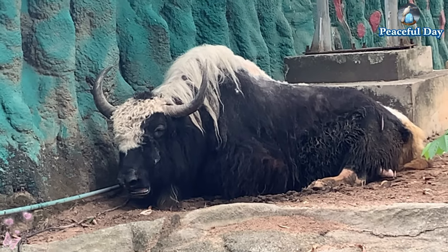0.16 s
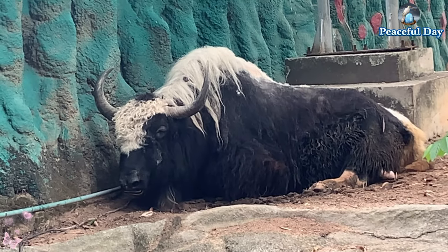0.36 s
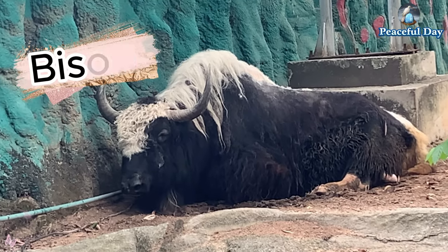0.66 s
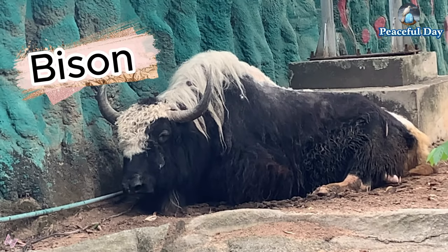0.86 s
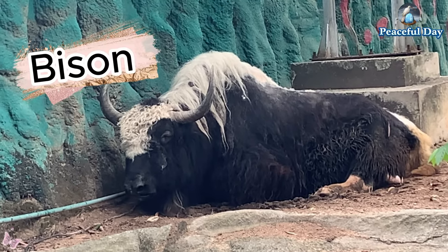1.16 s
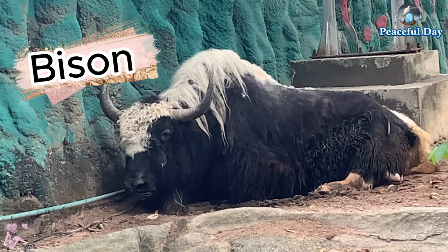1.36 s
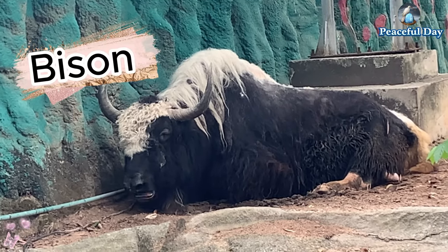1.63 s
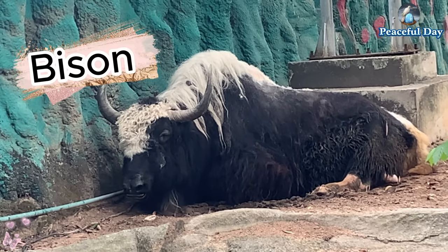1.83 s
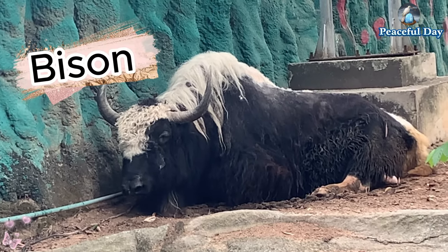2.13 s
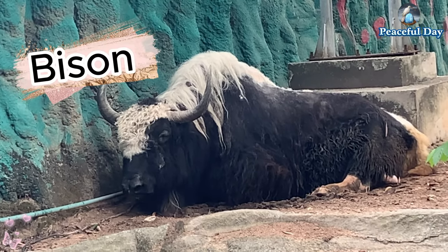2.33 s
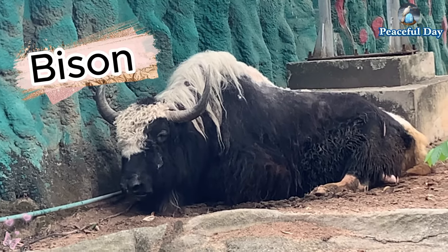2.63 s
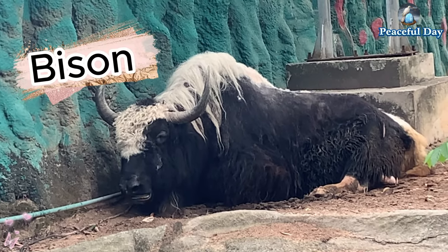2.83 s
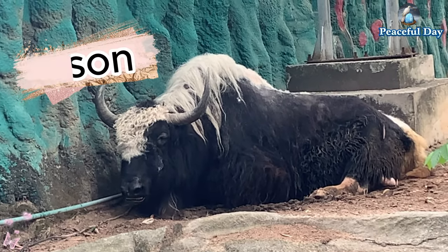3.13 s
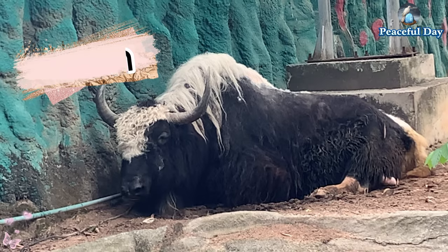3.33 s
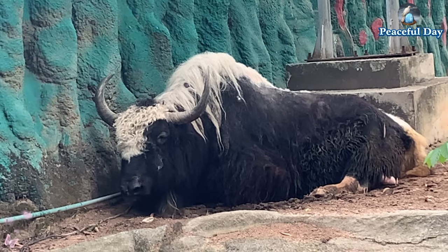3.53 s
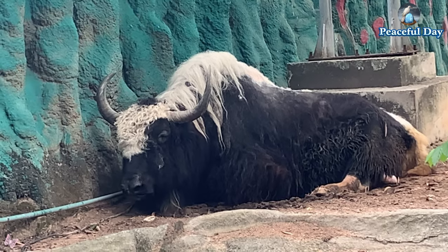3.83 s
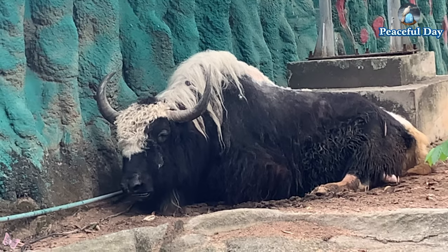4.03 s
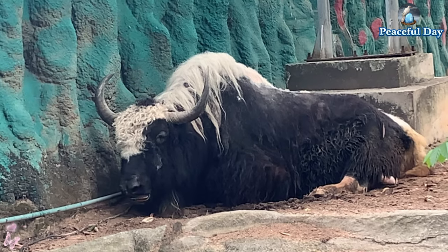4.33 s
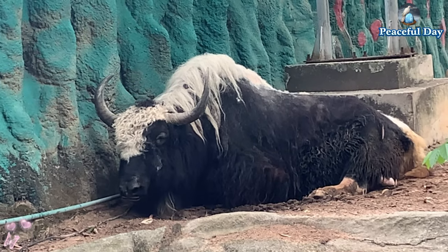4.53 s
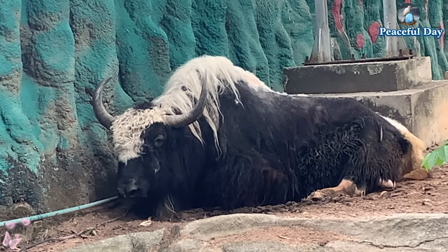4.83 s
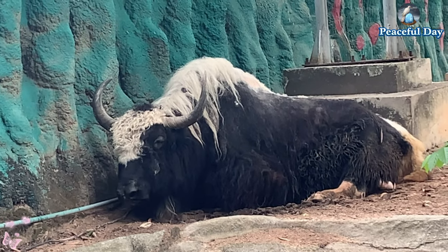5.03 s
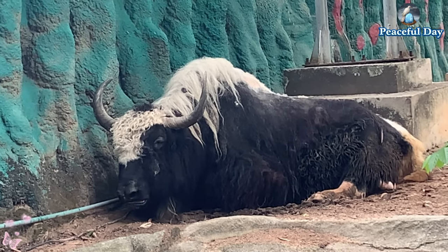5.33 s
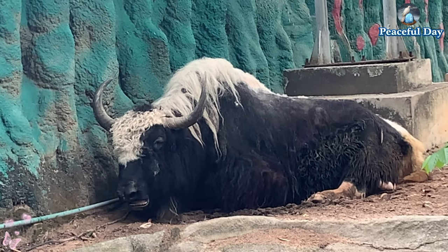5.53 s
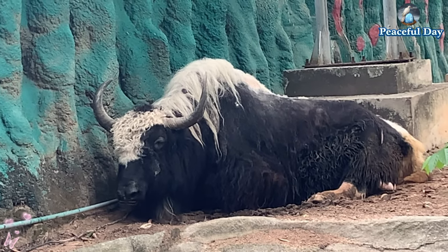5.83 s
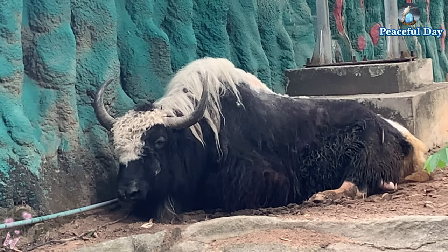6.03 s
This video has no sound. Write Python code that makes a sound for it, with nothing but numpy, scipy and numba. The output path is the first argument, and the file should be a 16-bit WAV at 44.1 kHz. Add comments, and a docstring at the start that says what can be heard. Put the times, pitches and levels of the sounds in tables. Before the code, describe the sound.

Deep, pulsing grunts from a resting yak, humming, snoring, growling, rasping and finally moaning, in a rock-walled enclosure with a soft low outdoor hum.

```python
"""A yak by a rock wall grunts five times; the second call is a dry, snoring rattle.
Source and filter: slow flaps of its vocal folds, with turbulent air, ring two low resonances of throat
and nose and weaker ones of mouth and lips; the wall sends back a dull echo of the pulses.
Around it: a few small ticks (snaps through a broad resonance), soft rustles (swells of hiss), steady
outdoor noise (coloured random noise) and a low rumble that swells now and then."""
import sys
import numpy as np
from scipy import signal
from scipy.fft import rfft, irfft
from scipy.io import wavfile
from scipy.ndimage import uniform_filter1d
from numba import njit

SR = 44100
rng = np.random.default_rng(int(sys.argv[2]) if len(sys.argv) > 2 else 0)


def int16_out(signal):
    """Quantize to a 16-bit WAV file."""
    q = np.round(np.clip(np.atleast_2d(signal).T, -1, 1) * 32767)
    wavfile.write(sys.argv[1], SR, q.astype(np.int16))


N = 272097
TIME = np.arange(N) / SR


def yak():
    """Source-filter voice: a humming grunt, a snore, a falling growl, a rasping grunt and a low moan."""
    # vocal folds in each call, slower by its end as the breath runs out: time_s, pulse_rate_hz, roughness (0-1)
    folds_1 = [(.55, 75.05, 0.21), (.77, 74.5, 0.23), (.81, 42.1, 0.29), (.96, 40.92, 0.18),
               (1.06, 30.87, .18), (1.24, 26.73, 0.02), (1.6, 23.48, 0.06)]
    folds_2 = [(1.61, 25.18, 0.53), (1.8, 23.72, 0.5), (1.99, 31.3, 0.082), (2.15, 31.85, 0.081),
               (2.33, 26.1, .2), (2.6, 22.63, 0.54)]
    folds_3 = [(2.8, 52.04, 0.33), (2.93, 63.47, 0.25), (3.0, 49.5, .07), (3.1, 41.3, 0.042),
               (3.3, 40.34, 0.061), (3.47, 29.13, 0.2), (3.87, 28.17, 0.11)]
    folds_4 = [(4.02, 48.07, 0.51), (4.32, 46.66, .28), (4.82, 32.01, .2)]
    folds_5 = [(5.54, 83.1, 0.12), (5.69, 72.44, 0.048), (5.9, 66.85, .05), (6.0, 61.55, 0.083),
               (6.17, 49.1, .3)]
    # resonances of mouth (low) and lips (high): frequency_hz at the crest of the call,
    # width_hz of the first of two passes, relative_level_db
    hum_modes = [(501, 34, 5.5), (963, 116, 8), (4120, 180, -19)]
    snore_modes = [(383, 132, 13), (620, 230, -1.5), (1117, 79, 0.5), (2370, 110, -3), (3760, 200, -16.5),
                   (7700, 800, -21.5)]
    growl_modes = [(566, 230, 0), (882, 150, 4.5), (1185, 190, 5), (4170, 300, -22)]
    rasp_modes = [(321, 51, 1), (503, 39, 0.72), (570, 70, 0.57), (893, 110, 0)]
    # throat level through each call, before the trim of that call: time_s, level_db
    throat_levels = [
        [(0.55, -51), (0.616, -43), (0.664, -61), (0.854, -19.5), (1.066, -32.5), (1.178, -22.5), (1.286, -37),
         (1.444, -32.5), (1.6, -50)],
        [(1.61, -45), (1.744, -36.5), (1.794, -42), (1.81, -33), (2.108, -34.5), (2.2, -28.5), (2.32, -37.5),
         (2.362, -32.5), (2.6, -46.5)],
        [(2.8, -49), (2.874, -25), (2.912, -35), (3.002, -27), (3.27, -25), (3.536, -36.5), (3.648, -29),
         (3.828, -41.5), (3.87, -50)],
        [(4.02, -46), (4.076, -37.5), (4.206, -36.5), (4.42, -42), (4.51, -33.5), (4.75, -27.5), (4.776, -33),
         (4.808, -51), (4.82, -40)],
        [(5.54, -46), (5.586, -29.5), (5.678, -23.5), (5.762, -23.5), (5.892, -27), (5.928, -31.5),
         (6.032, -31.5), (6.138, -27), (6.17, -37)],
    ]
    # the airway opens, holds and closes once a call; nose, mouth and lips hold for their own times:
    # full_s, rise_db_per_s, fall_db_per_s, nose_db, nose_hold_s, mouth_db, mouth_hold_s, lips_db, lips_hold_s
    openings = [(0.832, 44, 96, -23.5, .33, -38.5, 0.23, -41, .1),
                (2.099, 47, 61, -35, .16, -37.5, .15, -46, 0.075),
                (2.878, 450, 34.5, -32.5, 0.29, -53, 0.4, -41.5, .14),
                (4.132, 150, 104, -28, 0.477, -38, 0.49, -48, 0.49),
                (5.67, 220, 50, -31, 0.14, -47, .02, -44, 0.083)]
    # the nasal resonance arches over each call: crest_s, crest_hz, sag_hz_per_s on either side
    arches = [(.85, 235.5, 64.7), (2.06, 233, 55), (2.94, 207.4, 35), (4.26, 236.3, 179.7),
              (5.62, 220.6, 40)]
    # brief catches in the voice: centre_s, half_length_s, dip_db
    catches = [(0.643, 0.019, -16.5), (4.341, 0.006, -10), (4.421, 0.0062, -8), (4.558, 0.011, -8)]

    humming, snore, growl, rasping, moan = zip(throat_levels, openings, arches)
    voice = grunt(folds_1, *humming, hum_modes, throat_hz=149.8, throat_width=18.0, nose_width=24.6,
                  rasp=0.5, air_s=0.02, throat_trim_db=0.7, ragged_db=0.0, glide=0.61)
    voice += grunt(folds_2, *snore, snore_modes, throat_hz=141, throat_width=36, nose_width=80,
                   rasp=0.85, air_s=0.004, throat_trim_db=-0.5, ragged_db=1.1, throat_air=1.67)
    voice += grunt(folds_3, *growl, growl_modes, throat_hz=131.8, throat_width=39, nose_width=22,
                   rasp=1.0, air_s=0.0096, throat_trim_db=-0.4, ragged_db=3.0)
    voice += grunt(folds_4, *rasping, rasp_modes, throat_hz=151.0, throat_width=22, nose_width=25,
                   rasp=0.75, air_s=0.024, throat_trim_db=0.6, ragged_db=2.5, glide=0.19)
    voice += grunt(folds_5, *moan, growl_modes, throat_hz=130, throat_width=22, nose_width=20,
                   rasp=0.92, air_s=0.0065, throat_trim_db=0.2, ragged_db=3.5)
    return voice * undb(sum(dip_db * bell(s, half_s) for s, half_s, dip_db in catches))


def grunt(folds, effort, opening, nasal, resonances, throat_hz, throat_width, nose_width, rasp, air_s,
          throat_trim_db, ragged_db, glide=0.45, throat_air=0.39):
    """Source and filter: fold pulses and turbulent air excite resonances of throat, nose, mouth and lips."""
    # stretches where the voice settles into a hum: centre_s, half_length_s, pure_tone_share (0-1)
    hum_stretches = [(.75, 0.05, 0.78), (0.956, 0.067, 0.43), (4.284, .07, .55), (4.58, .15, 0.4)]
    lips_from_hz = 750
    pulse_hz, rough = curves(folds)
    throat_db, = curves(effort)
    full_s, rise, fall, nose_db, nose_hold, mouth_db, mouth_hold, lips_db, lips_hold = opening
    start, end = folds[0][0], folds[-1][0]
    nose_hz = arch(np.clip(TIME, start, end), *nasal)

    # the rougher the voice, the more air in throat and nose
    clicks = flaps(start, pulse_hz, rough)
    flow = wall(clicks + throat_air * rough * puffs(clicks, decay_s=0.029))
    throat = steady(band(ring(flow, throat_hz, throat_width), 92.4, 189.6, order=4))
    nose = steady(band(ring(flow, nose_hz, nose_width), 162.6, 288, order=2))

    # at times the voice settles on the nasal resonance and hums, its pitch wavering by about 1.2 %
    hum_turns = np.cumsum(nose_hz * (1 + .012 * walk(30))) / SR
    hum = np.sqrt(2) * np.sin(2 * np.pi * hum_turns)
    pure = sum(share * bell(s, half_s) for s, half_s, share in hum_stretches if start < s < end)
    pure = np.clip(pure, 0, 1)
    nose = steady(np.sqrt(1 - pure) * nose + np.sqrt(pure) * hum)

    # some closings are crisper than others
    crisp = clicks * undb(ragged_db * noise())
    airy = wall(crisp + rasp * puffs(crisp, air_s))

    # the upper resonances sink along with the nasal one; a second, broad pass keeps the valleys dark
    sink = (nose_hz / nose_hz.max()) ** glide
    mouth = lips = 0
    for hz, width, db in resonances:
        mode = undb(db) * ring(ring(airy, hz * sink, width), hz * sink, 3 * width)
        if hz < lips_from_hz:
            mouth = mouth + mode
        else:
            lips = lips + mode

    voice = undb(throat_db + throat_trim_db) * throat
    outlets = [(nose, nose_db, nose_hold),
               (steady(mouth), mouth_db, mouth_hold),
               (steady(lips), lips_db, lips_hold)]
    for outlet, db, hold_s in outlets:
        voice = voice + undb(db) * swell(full_s, rise, hold_s, fall) * outlet
    # short linear fades at both ends of the call
    return voice * np.clip(np.minimum(TIME - start, end + 0.022 - TIME) / 0.04, 0, 1)


def flaps(start, hz, rough, jitter_s=.004, scatter_db=6):
    """Pulse source: one click per closing of the folds; roughness scatters click times and sizes."""
    turns = np.cumsum(hz * (TIME >= start)) / SR
    closings = np.flatnonzero(np.diff(np.floor(turns)))
    shift, size = rng.standard_normal((600, 2))[:len(closings)].T
    shift_samples = (shift * rough[closings] * jitter_s * SR).astype(int)
    moved = np.clip(closings + shift_samples, 0, N - 1)
    return np.bincount(moved, undb(scatter_db * rough[closings] * size), N)


def puffs(clicks, decay_s):
    """Turbulence: noise follows each click and dies away exponentially, with the click's own energy."""
    gate = signal.lfilter([1], [1, -np.exp(-1 / (decay_s * SR))], clicks + 1e-18)
    return gate * noise() * np.sqrt(2 / (decay_s * SR))


def arch(t, crest_s, top_hz, sag):
    """Resonance glide: a hyperbola in time, with a rounded crest and nearly straight flanks."""
    rounding_s = 0.0998
    return top_hz - sag * (np.hypot(t - crest_s, rounding_s) - rounding_s)


def swell(full_s, rise, hold_s, fall):
    """Exponential envelope: gain rises to 1, holds and falls, with slopes in dB per s."""
    before = np.maximum(full_s - TIME, 0)
    after = np.maximum(TIME - full_s - hold_s, 0)
    return undb(-abs(rise) * before - abs(fall) * after)


def wall(x):
    """Single reflection: the rough rock wall returns a late, dull copy, which thickens the pulses."""
    delay_s, echo_db, echo_top_hz = .013, -7.5, 595
    late = np.interp(TIME - delay_s, TIME, x, left=0)
    return x + undb(echo_db) * signal.lfilter(*signal.butter(1, echo_top_hz, fs=SR), late)


def enclosure(x, t60_s=0.28, wet_db=-16):
    """Reverberation: rock walls and steps scatter a short, dull, exponentially decaying tail."""
    t = TIME[:SR // 2]
    scatter = rng.standard_normal(len(t)) * undb(-60 * t / t60_s) * (t > .006)
    # wet_db holds for the energy of the tail before this band-pass
    tail = band(scatter / np.linalg.norm(scatter), 76, 4000, order=1)
    return x + undb(wet_db) * signal.fftconvolve(x, tail)[:N]


def ticks(decay_s=0.00055, grit=0.3):
    """Impulse excitation: a sharp snap and a little decaying grit ring one broad resonance."""
    # small ticks: start_s, peak_db before reverberation, centre_hz, width_hz of the first of two passes
    tick_list = [(3.528, -28.5, 3306, 3360), (3.540, -24, 2200, 2490), (3.906, -33, 7500, 5000),
                 (3.917, -22, 5350, 3970), (4.845, -21.5, 1140, 790), (5.148, -31, 1000, 700)]
    out = 0
    for s, db, hz, width in tick_list:
        snap = np.bincount([int(s * SR)], minlength=N)
        scrape = grit * noise() * (TIME >= s) * np.exp(-np.abs(TIME - s) / decay_s)
        crack = ring(ring(snap + scrape, hz, width), hz, 2 * width)
        out = out + undb(db) * crack / np.abs(crack).max()
    return out


def rustles(grain_db=4.5):
    """Filtered noise: short bell-shaped swells of dry hiss, made grainy by a fast random gain."""
    # soft rustles: centre_s, level_db (rms at the crest), half_length_s, low_edge_hz
    rustle_list = [(0.376, -56.5, 0.14, 3970), (0.586, -50.5, 0.031, 4040), (1.677, -56, 0.035, 3520),
                   (1.758, -56, 0.019, 7000), (1.868, -47.5, 0.046, 3160), (3.115, -50.5, 0.054, 4500),
                   (3.205, -53, 0.018, 7000), (3.314, -56, .03, 7000), (3.931, -47, 0.04, 2940),
                   (4.799, -51, 0.012, 4000), (5.683, -51, 0.054, 4015)]
    top_hz = 7600
    hiss = noise() * undb(grain_db * walk(300))
    out = 0
    for s, db, half_s, low_hz in rustle_list:
        dry_hiss = band(band(hiss, low_hz, 30000), 1000, top_hz, order=1)
        out = out + unit(dry_hiss) * undb(db) * bell(s, half_s)
    return out


def outdoors(flicker_db=1.1, swell_db=0.31):
    """Random noise with a shaped spectrum: bands that swell together and flicker alone, over a rumble."""
    # colour of the outdoor noise: frequency_hz, relative_density_db (per Hz)
    air_colour = [(20, -20), (45, -2.5), (75, -10.5), (100, 0.5), (135, 2), (190, -12.5), (233, -7.5),
                  (290, -9), (750, -11), (1130, -13.5), (2100, -20.5), (5000, -30), (10000, -34),
                  (15500, -36.5)]
    # swells of the rumble: centre_s, half_length_s, level_db of the gain added to the floor
    rumble_swells = [(2.46, .08, -40.5), (4.4, .2, -53), (6.077, 0.11, -39.5)]
    air_db, rumble_floor_db = -42, -56
    hz, db = np.transpose(air_colour)
    bins_hz = np.fft.rfftfreq(N, 1 / SR) + 1  # 1 Hz up, so that the logarithm exists
    colour = undb(np.interp(np.log(bins_hz), np.log(hz), db))
    # octave bands; the lowest takes all below 120 Hz, the highest all above 7680 Hz
    octave = np.clip(np.log2(bins_hz / 60).astype(int), 0, 7)
    spectrum = rfft(noise()) * colour
    air = 0
    for k in np.unique(octave):
        air = air + irfft(spectrum * (octave == k), N) * undb(flicker_db * walk(12))
    surge = undb(rumble_floor_db)
    surge = surge + sum(undb(peak_db) * bell(s, half_s) for s, half_s, peak_db in rumble_swells)
    rumble = unit(band(noise(), 31.6, 59.0, order=2)) * surge
    return unit(air) * undb(air_db + swell_db * walk(1.67)) + rumble


def undb(db):
    """Level to amplitude: 20 dB is a factor of ten."""
    return 10 ** (np.asarray(db) / 20)


def curves(table):
    """Linear interpolation: each column of a table, joined by straight lines in time."""
    s, *columns = np.transpose(table)
    return [np.interp(TIME, s, c) for c in columns]


def bell(s, half_s):
    """Gaussian envelope: height 1 at time s, standard deviation half_s."""
    return np.exp(-((TIME - s) / half_s) ** 2 / 2)


def noise():
    """White noise: independent Gaussian samples of rms 1."""
    return rng.standard_normal(N)


def walk(rate):
    """Low-passed randomness: slow drift with a spread of about 1, from rate random values per second."""
    k = int(SR / rate)
    steps = np.repeat(rng.standard_normal(N // k + 1), k)
    return unit(uniform_filter1d(uniform_filter1d(steps, k), k)[:N])


def unit(x):
    """Normalisation: scale to a standard deviation of 1."""
    return x / np.std(x)


def steady(x):
    """Level control: hold the rms near 1 over several pulses, so that single pulses keep their shape."""
    power = uniform_filter1d(uniform_filter1d(x * x, size=3000), size=2200)
    return x / np.sqrt(np.abs(power) + 1e-4 * np.mean(x * x))


def band(x, low_hz, high_hz, order=2):
    """Butterworth band-pass: maximally flat between its edges."""
    edges = [low_hz, min(high_hz, SR / 2 - 1)]
    return signal.sosfilt(signal.butter(order, edges, "band", fs=SR, output="sos"), x + 1e-18)


def ring(x, hz, width):
    """Simple resonator: one mode with a fixed or moving centre and a width in Hz."""
    return svf(x, hz * np.ones(N), float(width))


@njit
def svf(x, hz, width):
    """State-variable band-pass: two integrators in a loop; the centre may move and has gain 1."""
    y, b, l = np.empty(len(x)), 0., 0.
    for i in range(len(x)):
        g, k = np.tan(np.pi * hz[i] / SR), width / hz[i]
        v = (b + g * (x[i] + 1e-18 - l)) / (1 + g * (g + k))
        b, l, y[i] = 2 * v - b, l + 2 * g * v, k * v
    return y


def scene():
    """Superposition: yak and ticks in the enclosure, plus the rustles and the outdoor noise."""
    return (enclosure(yak() + ticks()) + rustles() + outdoors())[None]


def record(dry):
    """Band limiting: a steep elliptic low-pass cuts the top of the treble."""
    top_hz = 15750
    return signal.sosfilt(signal.ellip(10, .2, 80, top_hz, fs=SR, output="sos"), dry)


dry = scene()
out = record(dry)
int16_out(out)
```